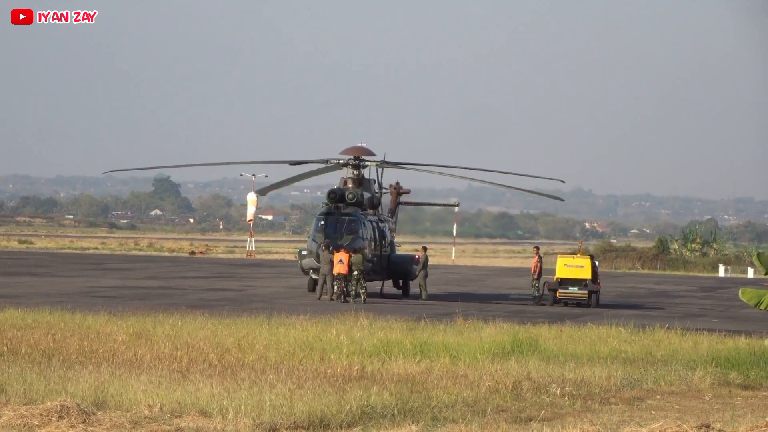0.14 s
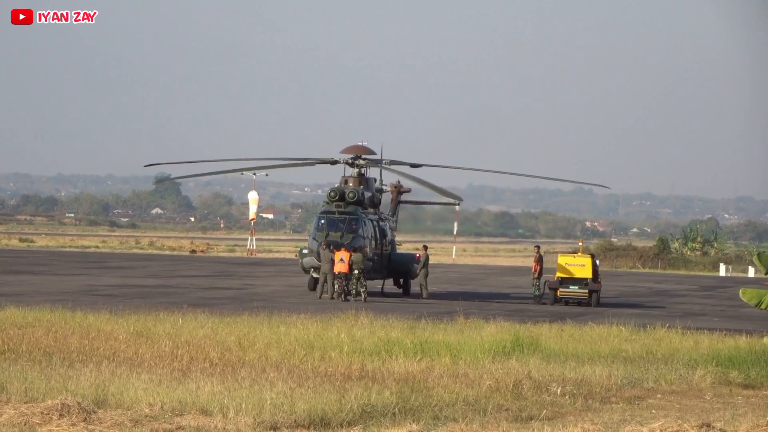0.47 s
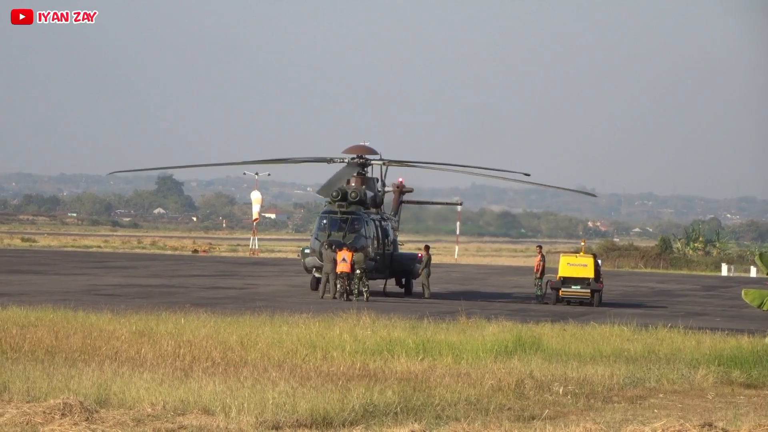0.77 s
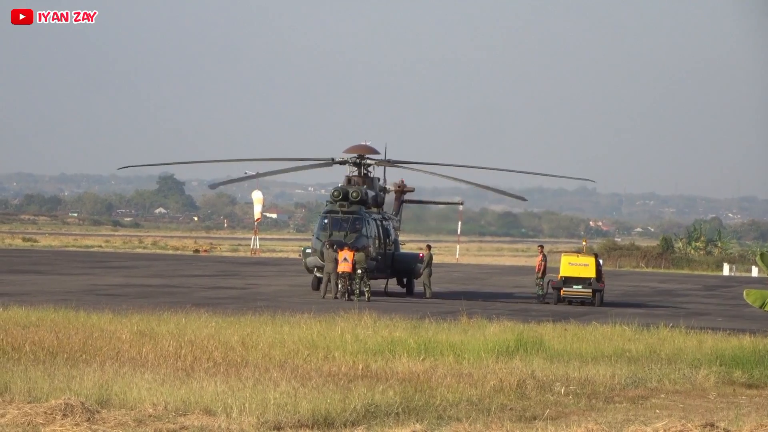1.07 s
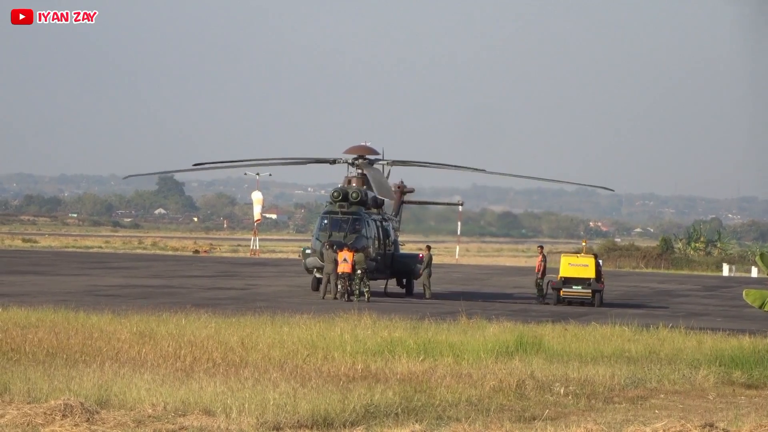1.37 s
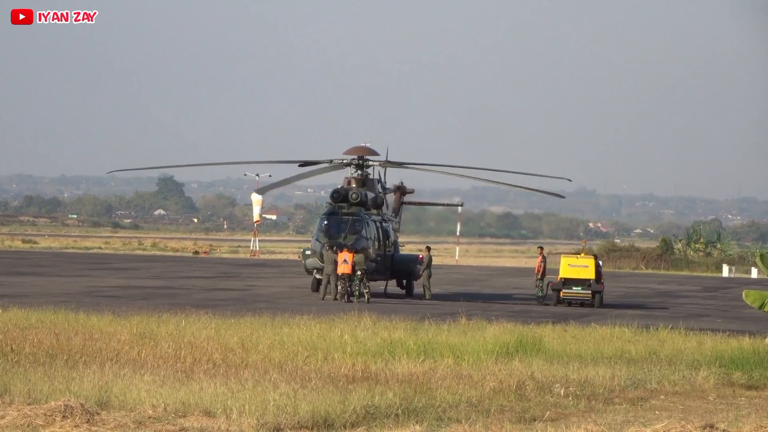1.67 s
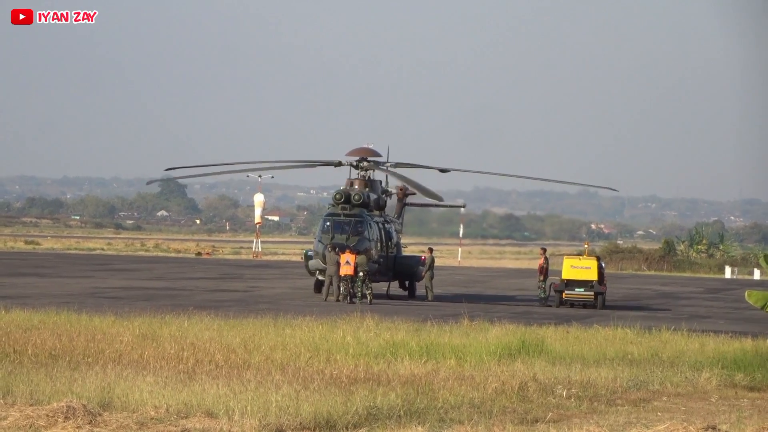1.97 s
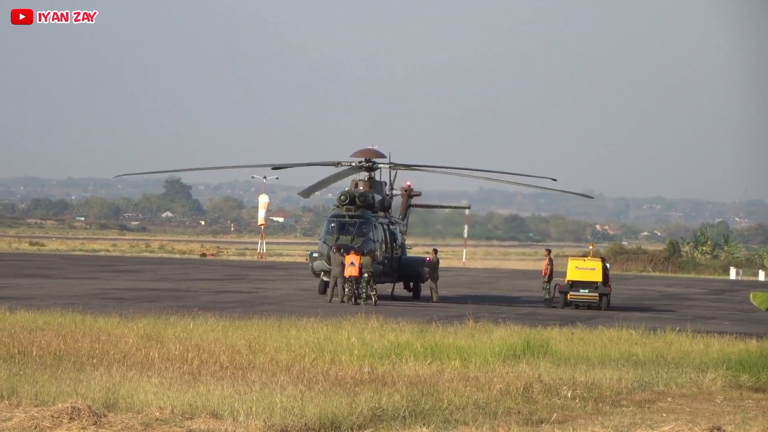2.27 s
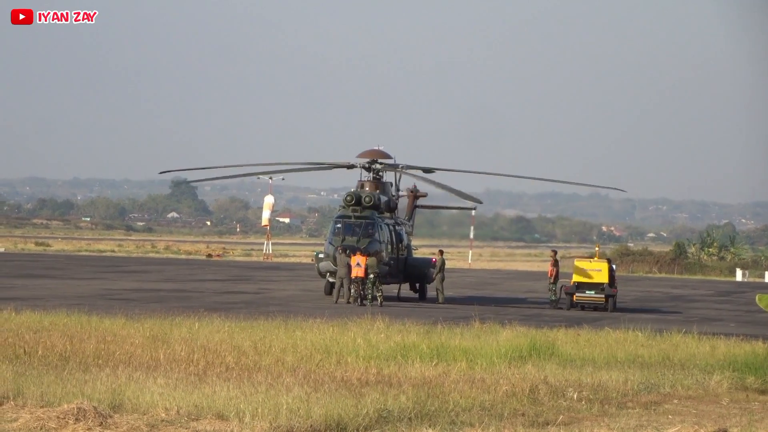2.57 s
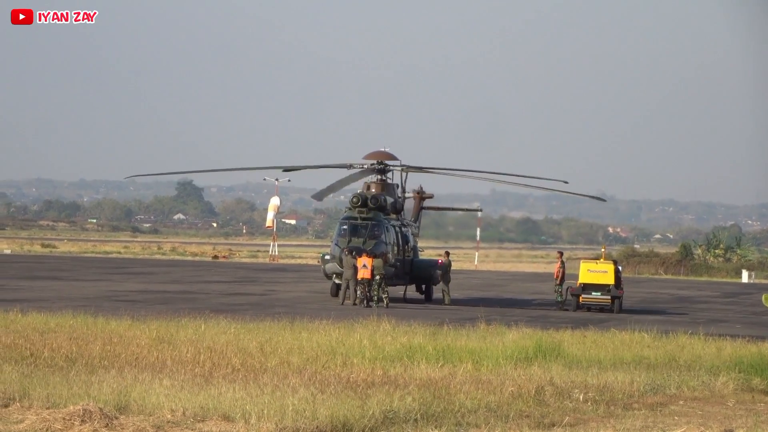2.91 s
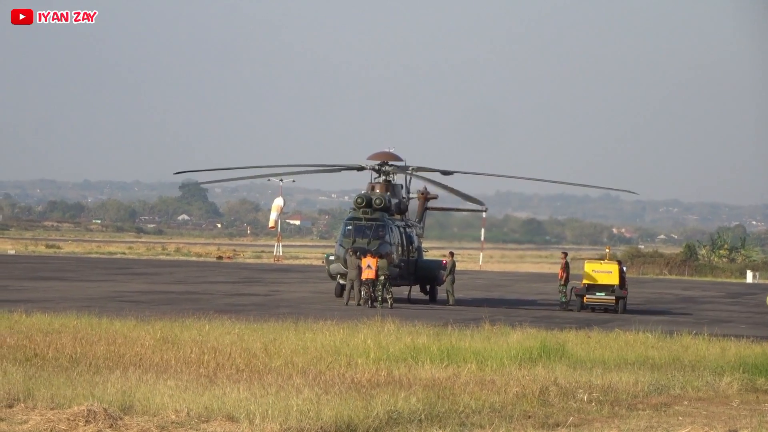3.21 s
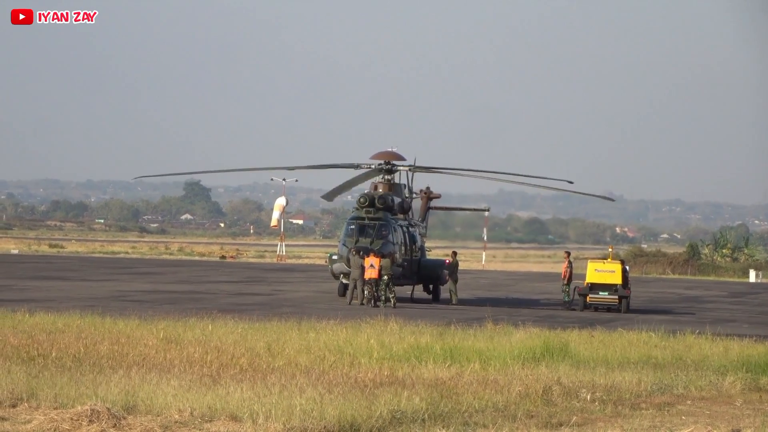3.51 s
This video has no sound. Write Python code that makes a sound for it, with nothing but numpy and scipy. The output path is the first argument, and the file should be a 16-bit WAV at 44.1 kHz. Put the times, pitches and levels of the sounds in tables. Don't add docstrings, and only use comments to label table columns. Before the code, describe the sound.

A distant helicopter turbine spools up, wavering high whine and steady hiss growing a bit louder

```python
import sys
import numpy as np
from scipy import signal
from scipy.fft import rfft, irfft, next_fast_len
from scipy.io import wavfile

SR = 44100
rng = np.random.default_rng(int(sys.argv[2]) if len(sys.argv) > 2 else 0)


def ratio_of_db(decibels):
    return 10 ** (np.asarray(decibels, float) / 20)


def dump_mix(stems):
    frames = np.atleast_2d(stems).T
    limited = np.clip(frames, -1, 1)
    pcm = np.round(limited * 32767).astype(np.int16)
    wavfile.write(sys.argv[1], SR, pcm)


N = 160965

# [t/s, speed/turns per s]
SHAFT_SPEED = [
    (0, 183.5),
    (.61, 187.44),
    (1.22, 191.85),
    (1.82, 196.48),
    (2.43, 201.07),
    (3.04, 205.38),
    (3.65, 209.16),
]
BLADE_COUNTS = (22, 34, 37, 40)
# [t/s, level/dB of each row in turn]
WHINE_LEVELS = [(0, -28.5, -36, -50, -38), (.27, -28, -35, -49, -37.5), (.5, -30, -35, -55, -44),
                (.85, -31, -45, -57, -45), (1.05, -33, -35, -54, -44), (1.23, -30, -37, -54, -38),
                (1.5, -35, -36, -52, -33), (1.75, -40, -38, -52, -42), (2.0, -37, -40, -50, -42),
                (2.2, -50, -40, -52, -40), (2.42, -36, -40, -52, -35), (2.55, -41, -41, -56, -41),
                (2.72, -48, -31, -51, -50), (2.9, -47, -34, -56, -36), (3.04, -36, -27, -42, -37),
                (3.2, -47, -26, -46, -46), (3.35, -45, -21, -38, -47), (3.65, -39, -25, -41, -48)]
# [multiple of shaft speed, width/Hz, level/dB]
SHAFT_HUMS = [(18, 40, -51)]
# [t/s, length/s, blade count of that row]
ROTOR_SHADES = [(.035, .03, 22), (.1, .03, 22), (.2, .025, 22), (.35, .08, 22), (.5, .035, 22),
                (.635, .07, 22), (.785, .02, 22), (.853, .02, 22), (.955, .03, 22), (1.01, .015, 22),
                (1.11, .06, 22), (1.18, .03, 22), (1.287, .025, 22), (1.33, .015, 22), (1.505, .02, 22),
                (1.7, .12, 22), (1.89, .06, 22), (2.6, .03, 22), (2.33, .1, 22), (.06, .03, 34),
                (.275, .025, 34), (.36, .07, 34), (.65, .08, 34), (.75, .02, 34), (.83, .03, 34),
                (.94, .12, 34), (1.11, .02, 34), (1.18, .04, 34), (1.25, .015, 34), (1.39, .02, 34),
                (1.53, .05, 34), (1.685, .015, 34), (1.77, .04, 34), (1.85, .02, 34), (2.26, .05, 34),
                (2.39, .02, 34), (2.61, .09, 34), (2.82, .025, 34), (2.9, .02, 34), (3.2, .05, 34),
                (3.42, .015, 34), (.1, .04, 40), (.21, .05, 40), (.46, .03, 40), (.6, .03, 40),
                (.78, .05, 40), (1.01, .04, 40), (1.12, .04, 40), (1.63, .02, 40), (1.82, .07, 40),
                (1.96, .03, 40), (2.06, .04, 40), (2.5, .015, 40), (3.09, .04, 40), (2.29, .06, 40),
                (2.84, .06, 40)]
# [t/s, length/s, f/Hz, level/dB]
FAINT_TONES = [(1.65, .22, 2757, -35.5), (3.03, .5, 1085, -39), (2.98, .2, 1610, -40), (3.1, .3, 1390, -39),
               (2.45, .3, 1825, -43), (2.53, .15, 2600, -41), (1.35, .35, 6000, -42),
               (2.15, .65, 3350, -40), (2.75, .3, 3420, -37), (2.96, .3, 3680, -35), (1.7, .12, 3760, -40),
               (1.45, .1, 3750, -41), (.38, .12, 7200, -42), (1.7, .25, 6060, -41), (2.62, .25, 5980, -41)]
# [f/Hz, level/dB per Hz]
IDLE_LOW = [(40, -29), (130, -19), (300, -9.5), (700, -4.5), (1400, -1.5), (2200, -4), (4000, -3),
            (4600, -9)]
IDLE_HIGH = [(4600, -9), (5200, -10), (6000, -3.5), (6600, -6), (7300, -9), (8300, -14.5), (9200, -18),
             (11000, -20.5)]
# [f/Hz, width/Hz, gain/dB]
IDLE_RESONANCES = [(770, 90, 6), (700, 40, 4), (1360, 43, 4), (850, 80, 2), (3360, 90, 2.5), (1830, 40, 3)]
# [f/Hz, level/dB per Hz]
JET_LOW = [(500, -39), (1200, -4), (2200, -11.5), (3300, -1.5), (4200, -3.5), (5200, -7.5), (6600, -6),
           (7500, -7)]
JET_HIGH = [(7500, -8), (8000, -1), (8600, -6), (9200, -17), (11000, -23.5)]
# [f/Hz, width/Hz, gain/dB]
JET_RESONANCES = [(3330, 130, 5), (3430, 80, 4), (3510, 50, -4), (3680, 110, 4), (3770, 50, -5),
                  (4050, 250, 2.5), (4690, 130, 8), (4850, 120, 4), (6510, 140, 4), (7080, 300, 6),
                  (4380, 200, -7), (5200, 250, -7), (1640, 110, 4), (2570, 60, 4)]
# [t/s, level/dB]
JET_POWER = [(0, -32), (1, -61), (1.6, -32), (2.1, -36), (2.5, -32), (2.8, -26.5), (3.05, -22),
             (3.2, -22.5), (3.35, -20), (3.65, -21.5)]
# [t/s, length/s, f/Hz, width/Hz,
# level/dB]
HISS_PATCHES = [(0.089, 0.4, 7020, 300, -34), (0.062, .4, 5760, 710, -36.5), (1.28, 1, 5970, 560, -38),
                (1.78, 0.34, 2950, 850, -41), (2.27, 0.6, 6420, 270, -35), (2.605, 0.65, 7890, 370, -30),
                (1.47, 1, 7670, 130, -42.5), (0.42, 0.93, 4860, 420, -44.5), (2.93, 0.85, 2770, 1400, -35),
                (2.78, .35, 3360, 340, -42), (3.08, 0.18, 3200, 700, -34), (3.03, 0.44, 4700, 140, -45),
                (3.6, 0.18, 5300, 200, -34), (3.64, 0.39, 6630, 330, -28), (1.61, 0.1, 3800, 600, -37),
                (3.45, 0.32, 7900, 300, -31.5)]
# [f/Hz, likeness 0..1]
PORT_LIKENESS = [(60, 0.97), (430, 1), (780, 0.95), (2200, .68), (3500, 0.76), (5200, 0.35), (8300, 0.5),
                 (9400, 0.12)]
# [f/Hz, left minus right level/dB]
PORT_LEAN = [(60, 2), (170, -0.5), (470, 0), (1320, -2.5), (3710, -0.5), (10400, 4)]
# [t/s, peak level/dB, f/Hz]
WIND_POPS = [(.203, -31, 300), (.291, -30, 300), (.304, -29, 200), (.325, -31, 380), (0.344, -37, 300),
             (.669, -21, 380), (0.697, -24, 334), (.703, -23, 330), (.72, -25, 400), (.731, -20.5, 450),
             (.736, -26, 400), (0.741, -33, 300), (0.751, -26, 220), (0.771, -26.5, 320), (.79, -30, 200),
             (.826, -28, 210), (0.831, -30, 300), (0.853, -31, 370), (0.86, -31, 370), (.864, -28, 300),
             (.885, -27, 400), (0.892, -29, 300), (1.209, -27.5, 232), (1.295, -32, 300), (1.304, -35, 250),
             (1.308, -24, 330), (1.63, -34, 220), (1.658, -25.5, 350), (1.687, -31, 250), (2.278, -33, 350),
             (2.504, -30, 250), (2.69, -26, 348), (2.741, -28, 340), (2.858, -31, 330), (3.055, -31, 240),
             (3.095, -33, 240), (3.194, -35, 400), (3.38, -36, 200), (3.505, -30, 240), (3.547, -27, 320)]

WHINE_PAN_DB, WHINE_PORT_RAD = (0, 1, 11, 0), (0.8, 0.71, 1.5, 0.76)
WHINE_TRIM_DB, SHADE_DB = 1.2, -11.5
SCATTER, FADE_PER_S, FADE_SHARED = 0.33, 26.0, 0.75
FAINT_WIDTH_HZ = 12.0
IDLE_DB, IDLE_RISE_DB = -28, 2.5
PATCH_DB, PATCH_PER_S = 1.5, 2.6
FLICKER_DB, FLICKER_PER_S = -0.1, 36.0
GUST_DB, GUST_PER_S = 0.14, 2.7
LAG_S, PORT_BEND_HZ = 1.6e-5, 9900
POP_CYCLES, POP_LEAD_RAD, POP_GAIN_DB, POP_RIGHT_DB = 1.25, 1, -0.5, 0.5
BREEZE_LOW_HZ, BREEZE_HIGH_HZ = 129, 535
BREEZE_DB, BREEZE_LUMP_DB, BREEZE_LUMPS_PER_S, BREEZE_APART = -49, 2.5, 10.0, 0.42
PEAK = 0.9


def rms_one(x):
    return x / np.sqrt(np.mean(x ** 2) + 1e-20)


def in_time(rows):
    s, *columns = np.transpose(rows)
    return [np.interp(np.arange(N) / SR, s, column) for column in columns]


def at_hz(points, hz):
    points = np.array(points)
    return np.interp(np.log(hz), np.log(points[:, 0]), points[:, 1])


def drift(rate):
    r = np.exp(-80 * np.pi * rate / SR)
    slow = signal.lfilter([1], [1, -2 * r, r * r], rng.standard_normal(N // 40 + 2002))
    slow = slow[2000:]
    return np.interp(np.arange(N) / 40, np.arange(len(slow)), rms_one(slow - slow.mean()))


def resonance(hz, centre, width):
    return 1 / (1 + (2 * (hz - centre) / width) ** 2)


def stereo_white():
    hz = np.arange(N // 2 + 1) * SR / N + 1e-3
    sides = np.array([[1], [-1]])
    mid, side = rfft(rng.standard_normal((2, N)))
    alike = np.clip(at_hz(PORT_LIKENESS, hz), 0, 1)
    pair = np.sqrt(1 + alike) * mid + np.sqrt(1 - alike) * side * sides
    balance = ratio_of_db(at_hz(PORT_LEAN, hz) / 2 * sides)
    lag = np.pi * hz * LAG_S * (1 + (hz / PORT_BEND_HZ) ** 2)
    return hz, pair * balance * np.exp(-1j * lag * sides) / np.sqrt(2)


def whine():
    t, out = np.arange(N) / SR, np.zeros((2, N))
    turn = 2 * np.pi * np.cumsum(in_time(SHAFT_SPEED)[0]) / SR
    rows = zip(BLADE_COUNTS, in_time(WHINE_LEVELS), WHINE_PAN_DB, WHINE_PORT_RAD)
    for blades, db, pan_db, port_rad in rows:
        shade = sum(np.exp(-(2 * (t - s) / length) ** 2)
                    for s, length, row in ROTOR_SHADES if row == blades)
        db = db + WHINE_TRIM_DB + SHADE_DB * shade
        both, left, right = (drift(FADE_PER_S) + 1j * drift(FADE_PER_S) for _ in range(3))
        for port, own in enumerate((left, right)):
            scattered = np.sqrt(FADE_SHARED / 2) * both + np.sqrt((1 - FADE_SHARED) / 2) * own
            path = (1 + SCATTER * scattered) * np.sqrt(2 / (1 + SCATTER ** 2))
            tone = np.exp(1j * (blades * turn + port * port_rad))
            out[port] += ratio_of_db(db - pan_db * port) * np.real(path * tone)
    return out + shaft_hums(turn)


def shaft_hums(turn):
    rise, out = ratio_of_db(in_time(JET_POWER)[0] + 22), 0
    for order, width, db in SHAFT_HUMS:
        rough = drift(width) * np.sin(order * turn) + drift(width) * np.cos(order * turn)
        out = out + ratio_of_db(db + 8) * rise * rough
    return out


def faint_tones():
    t, out = np.arange(N) / SR, 0
    for s, length, hz, db in FAINT_TONES:
        rough = 1 + 0.5 * (drift(FAINT_WIDTH_HZ) + 1j * drift(FAINT_WIDTH_HZ))
        swell = np.exp(-(2 * (t - s) / length) ** 4)
        out = out + ratio_of_db(db) * swell * np.real(rough * np.exp(2j * np.pi * hz * t))
    return out


def rush(spectrum, resonances, gust):
    hz, white = stereo_white()
    db = at_hz(spectrum, hz) + sum(gain * resonance(hz, f, width) for f, width, gain in resonances)
    coloured = white * ratio_of_db(db)
    place = 9 * np.log(1 + hz / 500)
    out = 0
    for band in range(30):
        depth = min(band / 14, 1)
        fade_db = PATCH_DB * drift(PATCH_PER_S) + FLICKER_DB * drift(FLICKER_PER_S) + GUST_DB * gust
        window = np.cos(np.pi / 2 * np.clip(place - band, -1, 1)) ** 2
        out = out + ratio_of_db(depth * fade_db) * irfft(coloured * window, N)
    return rms_one(out)


def hiss_patches():
    hz, white = stereo_white()
    t, out = np.arange(N) / SR, 0
    for s, length, f, width, db in HISS_PATCHES:
        swell = np.exp(-(2 * (t - s) / length) ** 4)
        out = out + ratio_of_db(db) * swell * rms_one(irfft(white * resonance(hz, f, width), N))
    return out


def wind():
    t, pops = np.arange(N) / SR, np.zeros(N, complex)
    for s, db, hz in WIND_POPS:
        near = slice(int((s - 0.02) * SR), int((s + 0.02) * SR))
        cycles = hz * (t[near] - s)
        pops[near] += ratio_of_db(db + POP_GAIN_DB) * np.exp(-(2 * cycles / POP_CYCLES) ** 2 + 2j * np.pi * cycles)
    band = signal.butter(2, [BREEZE_LOW_HZ, BREEZE_HIGH_HZ], "band", fs=SR, output="sos")
    shared, *own = rms_one(signal.sosfilt(band, rng.standard_normal((3, N))))
    lumps = ratio_of_db(BREEZE_DB + BREEZE_LUMP_DB * drift(BREEZE_LUMPS_PER_S))
    both = pops + lumps * signal.hilbert(shared, next_fast_len(N))[:N]
    lead = np.exp(0.5j * POP_LEAD_RAD * np.array([[1], [-1]]))
    balance = ratio_of_db(np.array([[0], [POP_RIGHT_DB]]))
    return np.real(both * lead * balance) + BREEZE_APART * lumps * np.array(own)


def scene():
    gust = drift(GUST_PER_S)
    idle_level = ratio_of_db(IDLE_DB + IDLE_RISE_DB * np.arange(N) / N)
    idle = idle_level * rush(IDLE_LOW + IDLE_HIGH[1:], IDLE_RESONANCES, gust)
    jet_level = ratio_of_db(in_time(JET_POWER)[0])
    jet = jet_level * rush([(60, -60)] + JET_LOW + JET_HIGH[1:], JET_RESONANCES, gust)
    return whine() + faint_tones() + idle + jet + hiss_patches() + wind()


def band_limit(x):
    return signal.sosfilt(signal.butter(12, 11000, fs=SR, output="sos"), x)


def record(dry):
    rounded = PEAK * np.tanh(dry / PEAK)
    bass_cut = signal.butter(2, 45.0, "high", fs=SR, output="sos")
    mix = signal.sosfilt(bass_cut, rounded)
    return band_limit(mix)


dry = scene()
out = record(dry)
dump_mix(out)
```